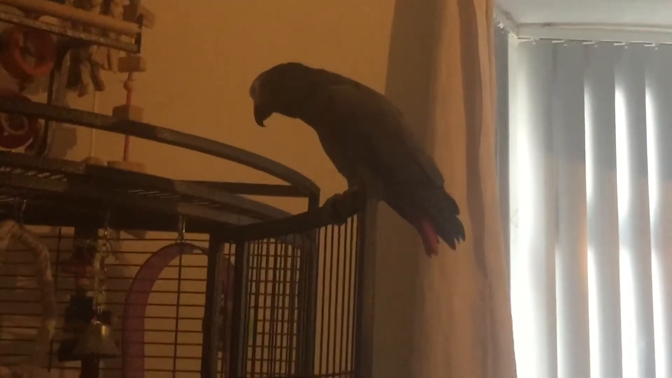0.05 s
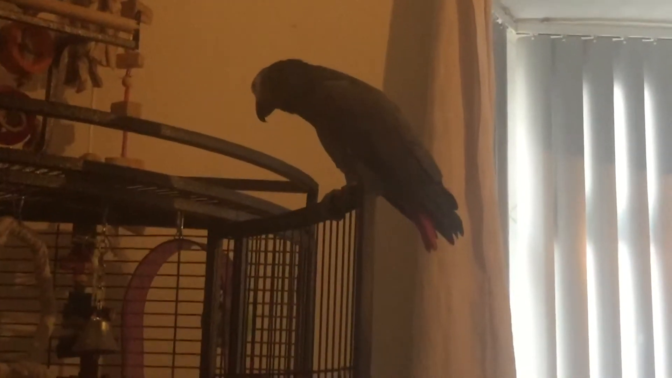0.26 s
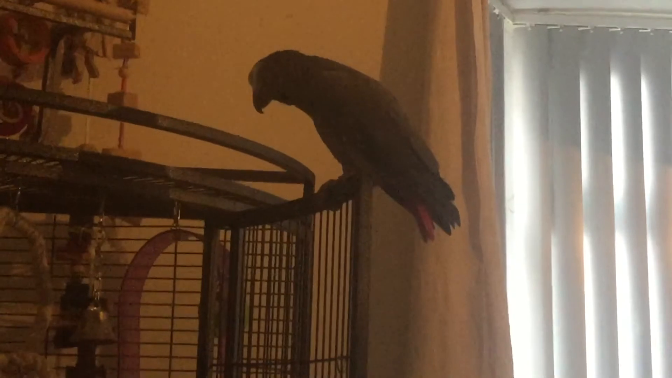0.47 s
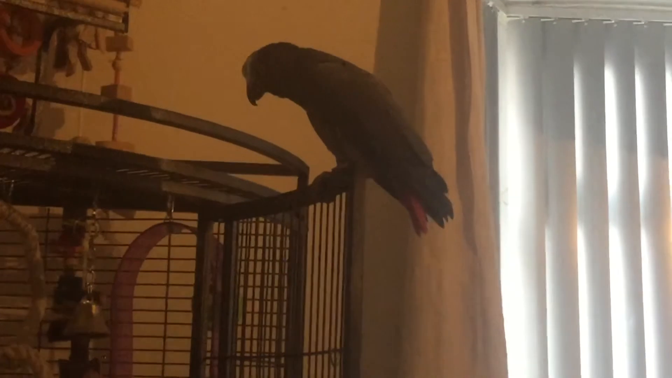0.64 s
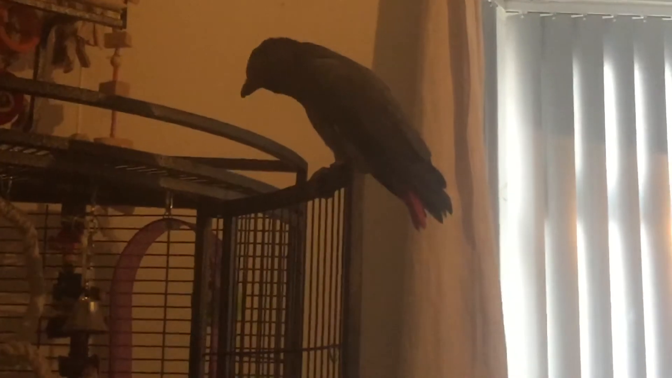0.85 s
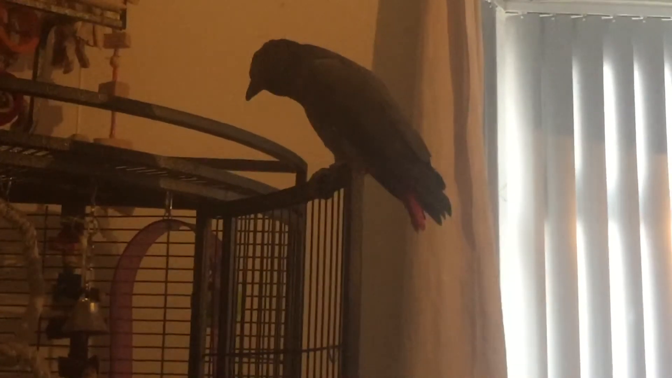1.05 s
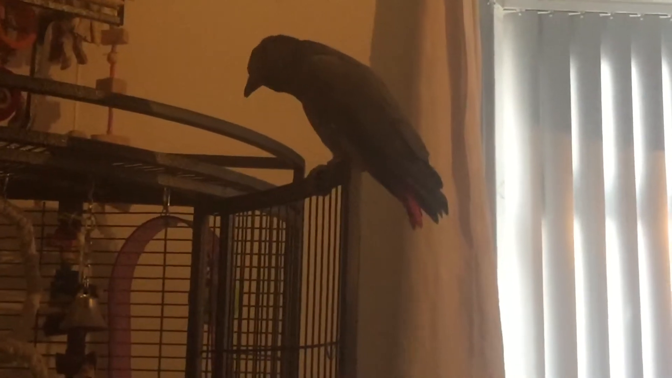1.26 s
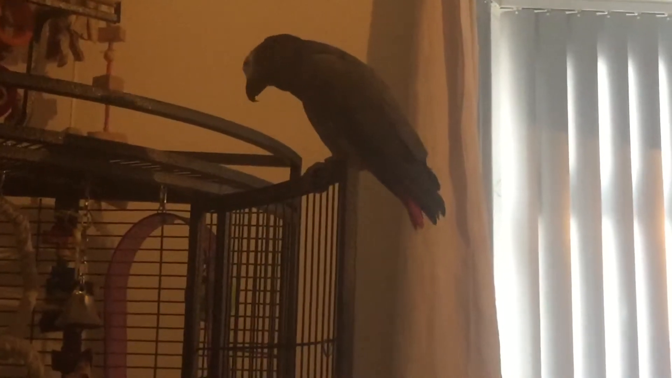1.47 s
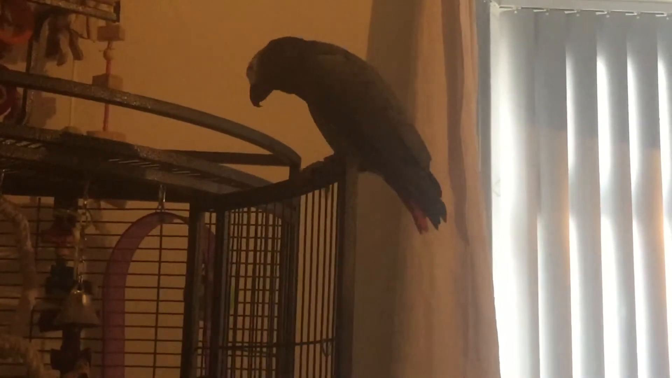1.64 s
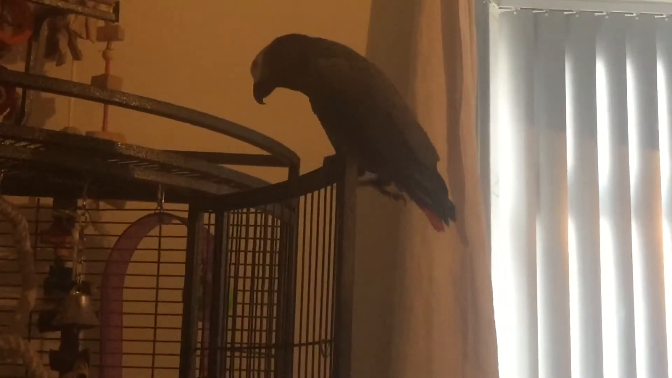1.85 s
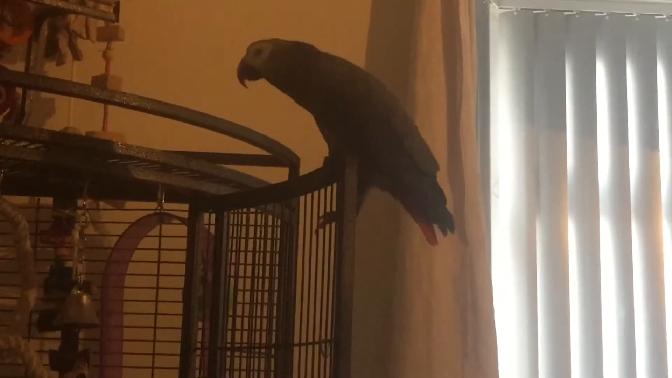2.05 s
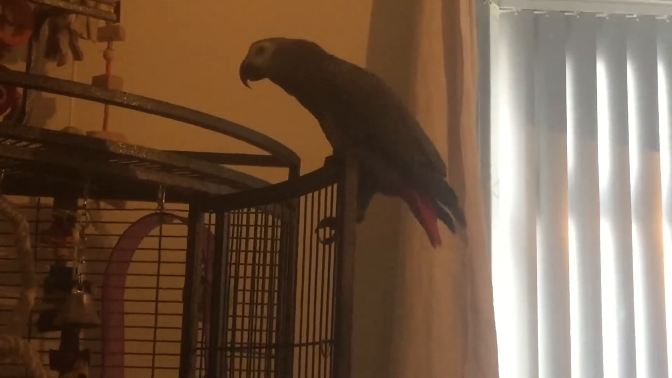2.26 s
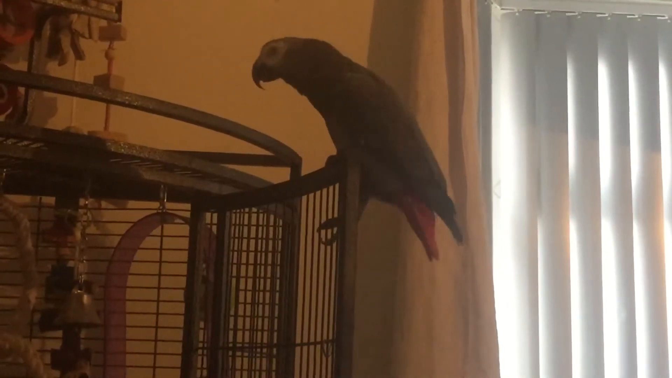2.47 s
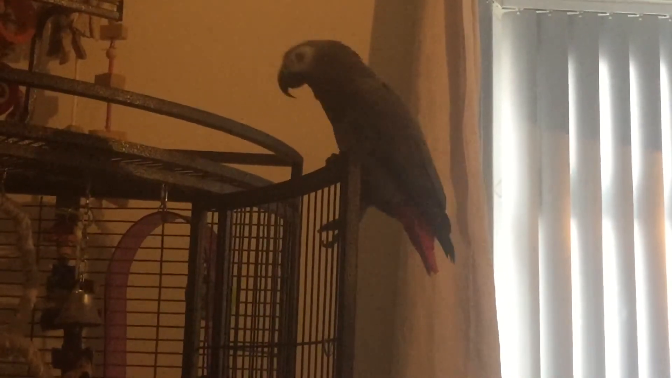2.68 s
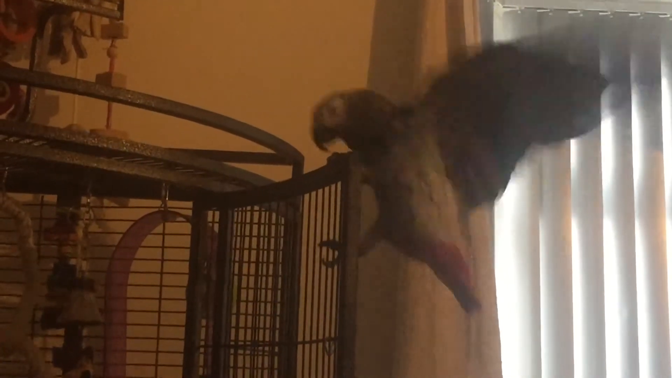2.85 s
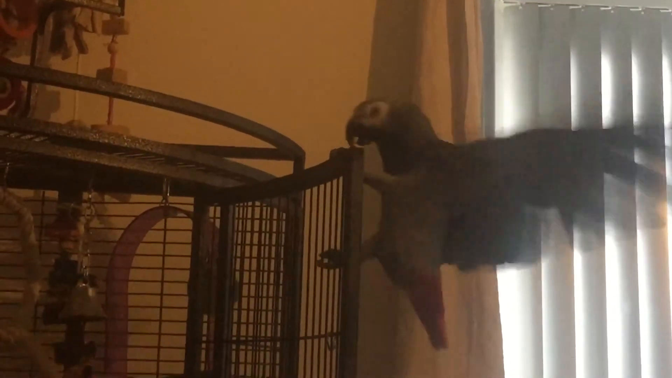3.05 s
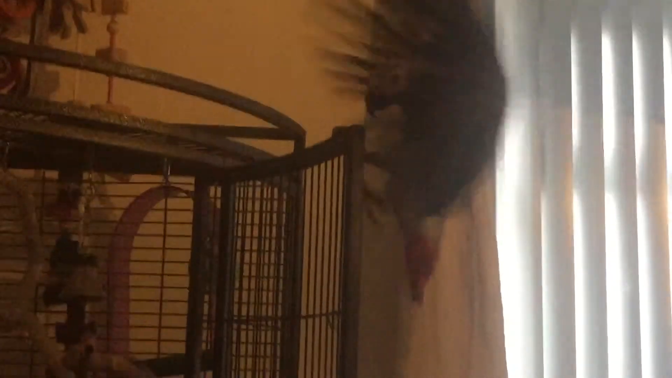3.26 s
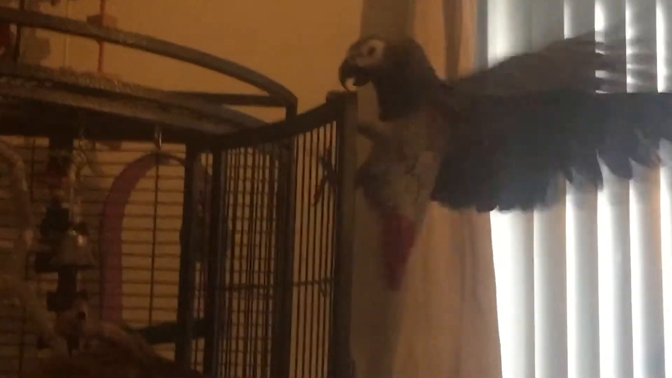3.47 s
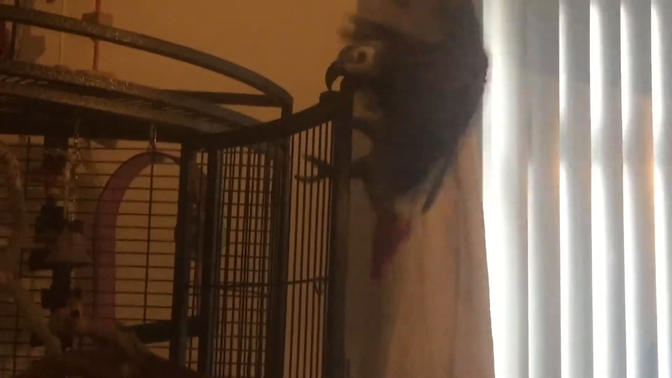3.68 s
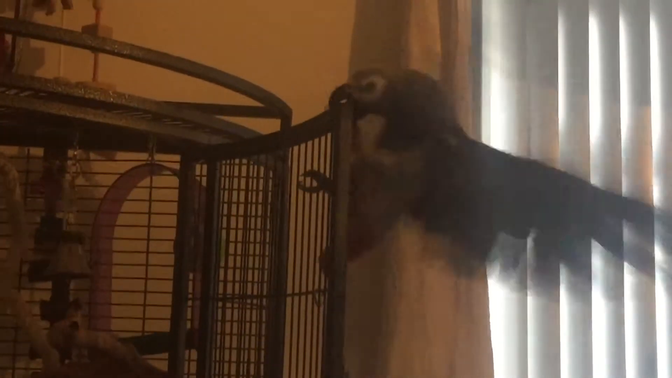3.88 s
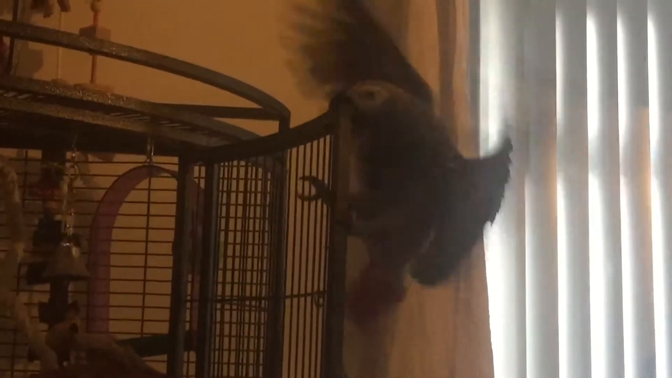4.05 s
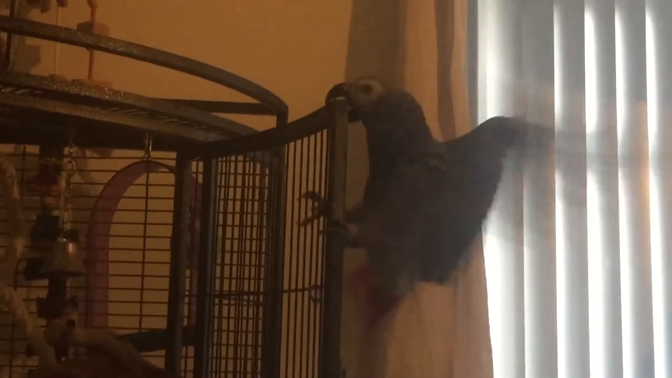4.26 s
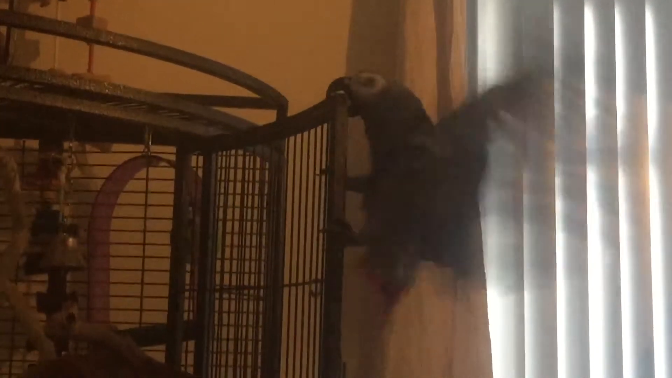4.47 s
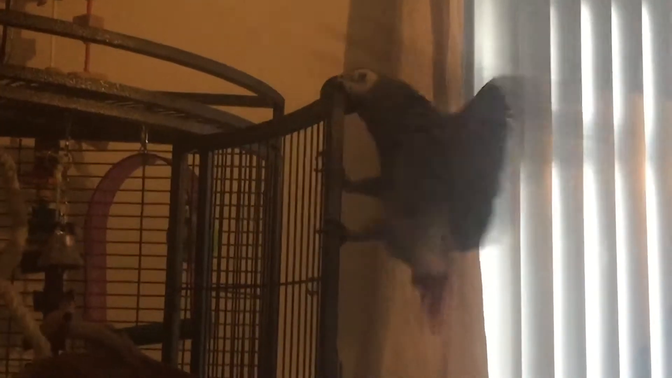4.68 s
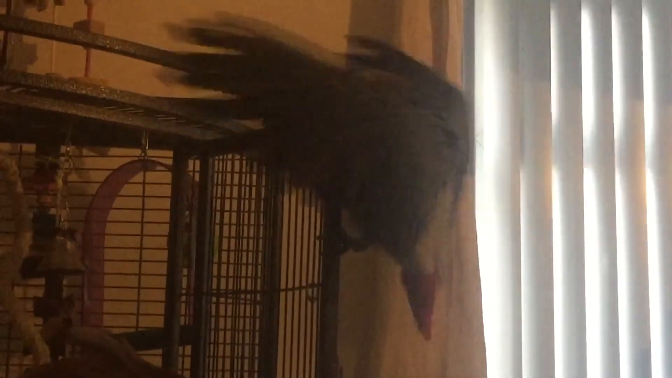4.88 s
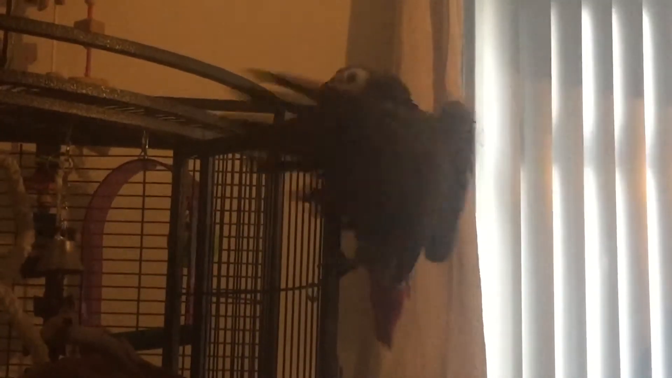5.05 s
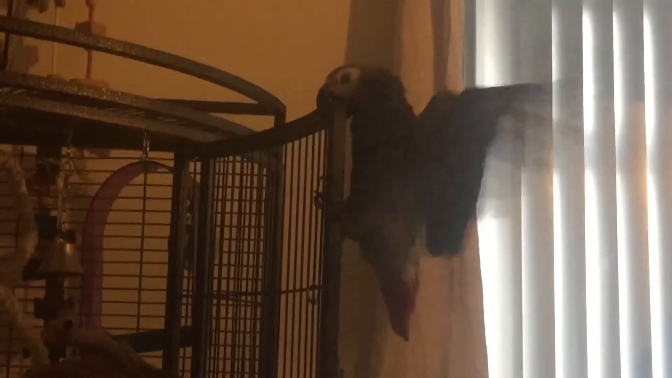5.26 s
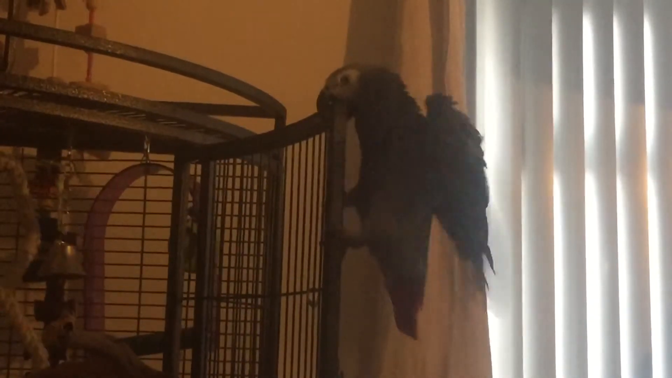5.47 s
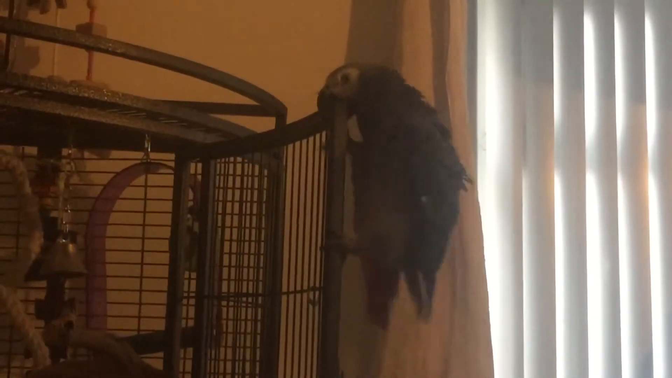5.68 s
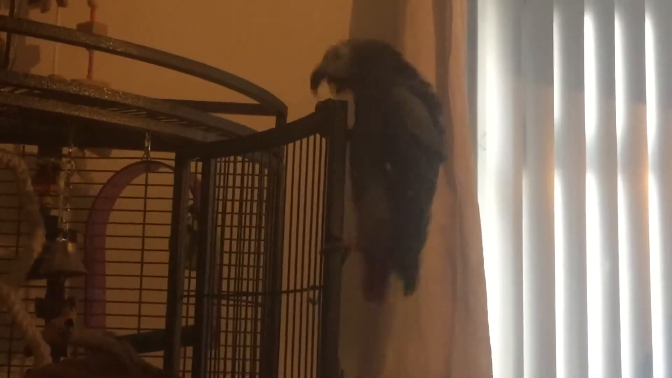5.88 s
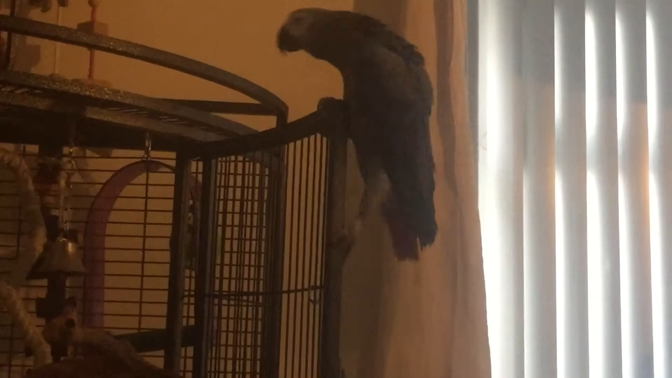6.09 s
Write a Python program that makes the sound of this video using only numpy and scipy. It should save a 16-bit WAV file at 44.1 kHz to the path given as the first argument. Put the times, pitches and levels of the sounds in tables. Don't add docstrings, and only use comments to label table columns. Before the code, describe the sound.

In a small, fairly dry room, a steady low electrical hum and soft ventilation continue throughout. A parrot on a wire cage makes faint brushes, a latch knock and claw scrapes. Then its wings beat fast, about seven strokes a second, with crisp feather hiss, snaps and soft thumps, while wires ring and the latch rattles. The flapping thins out, leaving hum and light rustles. The microphone is nearby and catches low gusts of air.

```python
import sys
import numpy as np
from scipy import signal
from scipy.fft import rfft, irfft, next_fast_len
from scipy.io import wavfile

SR = 44100
rng = np.random.default_rng(int(sys.argv[2]) if len(sys.argv) > 2 else 0)


def elevation(decibels):
    levels = np.asarray(decibels, float)
    return 10 ** (levels / 20)


def to_wav(s):
    ch = np.atleast_2d(s).T
    pcm = np.round(np.clip(ch, -1, 1) * 32767)
    wavfile.write(sys.argv[1], SR, pcm.astype(np.int16))


N = 270059


def rms_one(x):
    return x / np.sqrt(np.mean(x ** 2) + 1e-20)


def in_time(rows):
    s, *columns = np.transpose(rows)
    return [np.interp(np.arange(N) / SR, s, c) for c in columns]


def drift(rate_hz):
    r = np.exp(-80 * np.pi * rate_hz / SR)
    chance = rng.standard_normal(N // 40 + 2002)
    slow = signal.lfilter([1], [1, -2 * r, r * r], chance)[2000:]
    return np.interp(np.arange(N) / 40, np.arange(len(slow)), rms_one(slow))


def coloured(spectrum):
    hz, db = np.transpose(spectrum)
    size = next_fast_len(N)
    grid_hz = np.maximum(np.fft.rfftfreq(size, 1 / SR), 1)
    gain = elevation(np.interp(np.log(grid_hz), np.log(hz), db))
    return rms_one(irfft(rfft(rng.standard_normal(size)) * gain, size)[:N])


def resonance(x, hz, width_hz):
    r = np.exp(-np.pi * width_hz / SR)
    poles = [1, -2 * r * np.cos(2 * np.pi * hz / SR), r * r]
    return signal.lfilter((1 - r * r) / 2 * np.array([1, 0, -1]), poles, x)


def tone(hz, level_db, phase):
    t = np.arange(N) / SR
    return np.sqrt(2) * elevation(level_db) * np.sin(2 * np.pi * hz * t + phase)


def bursts(times, levels_db, lengths, rise_s):
    out = np.full(N, 1e-9)
    for s, db, length in zip(times, levels_db, lengths):
        start = int((s - rise_s) * SR)
        length = max(length, .004)
        t = np.arange(min(int(8 * length * SR), N - start)) / SR
        swell = (1 - np.exp(-2 * t / rise_s)) * np.exp(-(t / length) ** 1.33)
        out[start:start + len(t)] += elevation(db) * swell
    return out


def patchy(noise, low_hz, high_hz, patch_db, rate, count=7):
    size = next_fast_len(N)
    spectrum = rfft(noise, size)
    pitch = np.log(np.fft.rfftfreq(size, 1 / SR) + 1)
    centres = np.log(np.geomspace(low_hz, high_hz, count))
    out = np.zeros(N)
    for one in np.eye(count):
        band = irfft(spectrum * np.interp(pitch, centres, one), size)[:N]
        out += band * elevation(patch_db * drift(rate))
    return rms_one(out)


def grainy(noise):
    grains_per_s, grain_share = 900, 0.43
    sizes = elevation(5.2 * np.minimum(rng.exponential(1, N), 3.0))
    catches = (rng.random(N) < grains_per_s / SR) * sizes
    return rms_one(noise * (1 + grain_share * rms_one(signal.lfilter([1], [1, -.93], catches))))


def knocks(table):
    out = np.zeros(N)
    size = int(.3 * SR)
    for s, db, hz, width_hz, t60 in table:
        start = int(s * SR)
        t = np.arange(min(size, N - start)) / SR
        band = resonance(rng.standard_normal(size), hz, width_hz)
        cluster = rms_one(resonance(band, hz, width_hz))[:len(t)]
        onset = 1 - np.exp(-t / (0.0088 * t60 ** 2 + 0.00041))
        out[start:start + len(t)] += cluster * elevation(db - 60 * t / t60) * onset
    return out


def struck(modes, hits):
    return knocks([(s, db + mode_db, hz, width_hz, t60 * ring)
                   for s, db, ring in hits for hz, width_hz, mode_db, t60 in modes])


def room(x):
    t60_s = 0.06
    t = np.arange(int(.4 * SR)) / SR
    noise = rng.standard_normal(len(t)) * (t > .006)
    dull = signal.lfilter([.3], [1, -.7], noise)
    bright = noise - dull
    tail = dull * elevation(-60 * t / t60_s) + bright * elevation(-60 * t / (0.85 * t60_s))
    return signal.fftconvolve(x, tail / np.sqrt(np.sum(tail ** 2)))[:N]


def ventilation():
    # frequency in Hz, density in dB per Hz.
    air_spectrum = [(20, -34), (40, -37.5), (70, -11), (130, -13.5), (200, -16), (370, -29), (560, -22.5),
                    (750, -26), (1500, -33.5), (1850, -49), (2200, -47), (6500, -53), (10500, -57),
                    (15800, -55.5)]
    # centre in Hz, width in Hz, level in dB.
    duct = [(290, 15, -1), (410, 62, -7.5), (516, 17, -7.5), (606, 16, -10), (692.6, 8.3, 0.5),
            (950, 55, -4.5), (990, 35, -8.5), (1200, 22, -2), (1373, 78, -8.5), (1650, 57, -4),
            (1758, 36, -6), (1850, 11, -15.5), (2628, 31, -16.5)]
    air = coloured(air_spectrum)
    flow = signal.sosfilt(signal.butter(2, 2200, fs=SR, output="sos"), air)
    out = elevation(-54) * (air + flow * (elevation(drift(7.6)) - 1))
    white = rng.standard_normal(N)
    for hz, width_hz, db in duct:
        out += elevation(db - 68.5 + 2.5 * drift(3.2)) * rms_one(resonance(white, hz, max(width_hz, 20)))
    return out


def appliance():
    # time in seconds, level in dB.
    hum = [(0.0, -32.5), (0.03, -31), (0.47, -34), (1.04, -31.5), (1.29, -34), (2.13, -32), (2.56, -34),
           (2.74, -32.5), (3.0, -34), (3.44, -31), (3.7, -33), (3.73, -34.5), (4.23, -30.5), (4.72, -33),
           (5.4, -31.5), (5.9, -34), (6.09, -32.5), (6.12, -34.5)]
    # time in seconds, level in dB.
    overtone = [(0.0, -54), (0.19, -64), (1.45, -57.5), (1.52, -76), (1.6, -56), (2.15, -73), (2.23, -48),
                (2.38, -64), (2.54, -56), (2.64, -68), (4.18, -57.5), (4.23, -70), (4.82, -57), (5.13, -67),
                (6.03, -61), (6.12, -70)]
    # frequency in Hz, level in dB, wobble in dB.
    tones = [
        (38.8, -67.5, -0.5),
        (834.4, -61, 0.4),
        (1500, -70.5, 2),
    ]
    out = tone(99.95, in_time(hum)[0] + 0.52 * drift(6.3), 0.18 * drift(0.45))
    out += tone(198.5, in_time(overtone)[0] - 0.5, 1.4 * drift(3.0))
    for hz, db, wobble_db in tones:
        out += tone(hz, db + wobble_db * drift(1.2), 1.11 * drift(1.1))
    return out


def rustles():
    # start in seconds, level in dB, ring in Hz, width in Hz, t60 in seconds.
    brushes = [(.26, -54.5, 1260, 500, 0.44), (.28, -61, 1650, 500, 0.38), (1.29, -62, 3380, 400, .1),
               (2.097, -56, 9200, 8900, .16), (2.099, -61.5, 4500, 500, 0.33),
               (2.125, -58.5, 3000, 500, 0.51), (2.13, -56.5, 3900, 5000, 0.36),
               (2.15, -59, 1730, 400, 0.21), (2.881, -70, 4460, 300, .5), (2.885, -69, 5200, 400, .5),
               (2.89, -73, 8700, 600, .4), (2.9, -61, 4000, 3500, .3), (4.353, -50, 9800, 249, 0.16),
               (4.353, -49, 8600, 300, 0.22), (4.353, -50, 11900, 5984, 0.16),
               (5.104, -56, 6150, 800, 0.31), (5.528, -50, 11300, 600, 0.29), (5.53, -59, 3195, 60, .7),
               (5.281, -55, 11000, 400, .12), (5.11, -56, 1970, 150, .3), (3.67, -51.5, 1976, 101, .35),
               (3.655, -57, 4790, 80, .6), (2.245, -64, 11400, 596, 0.23), (5.701, -55.5, 9800, 500, .2),
               (5.701, -57, 11600, 700, 0.18), (5.701, -58, 14150, 500, 0.18),
               (5.701, -51.5, 12000, 7000, .16), (4.632, -42.5, 4940, 5000, 0.25),
               (5.529, -64, 9900, 8700, .08), (5.979, -60, 5100, 2500, 0.15), (5.99, -64, 2690, 2000, 0.37),
               (6.016, -68, 9000, 8950, 0.16)]
    return knocks(brushes)


def latch():
    # centre in Hz, width in Hz, level in dB, t60 in seconds.
    modes = [(5990, 410, 4, 0.071), (6200, 880, -11, 0.38), (3310, 390, -10.5, 0.19),
             (1400, 810, -8.5, 0.34), (7300, 1300, -16.5, 0.12), (2560, 200, -11.5, 0.14),
             (10000, 9050, -14, .028)]
    # start in seconds, level in dB, share of the ring time.
    hits = [
        (1.56, -46, 0.7),
        (2.243, -63, 1),
        (2.736, -65.5, 1),
        (4.2817, -43.5, 0.86),
        (6.019, -60.5, 1.04),
    ]
    return struck(modes, hits)


def chain():
    # centre in Hz, width in Hz, level in dB, t60 in seconds.
    modes = [(9400, 480, 1, 0.24), (11900, 1000, -5, 0.18), (14300, 1400, -16, 0.12),
             (11900, 9400, 0, 0.23)]
    # start in seconds, level in dB, share of the ring time.
    hits = [
        (3.416, -43, 1.2),
    ]
    return struck(modes, hits)


def wires(count=10):
    # start in seconds, level in dB, brightness in dB per octave, freedom to ring 0-1.
    claws = [(2.0963, -55.5, 3, 0.8), (2.139, -60, -1, 0.9), (2.2423, -54, 1.5, 0.28), (2.4244, -70, 3, .7),
             (3.316, -56, 6, .5), (3.358, -59, -3, 0.7), (3.634, -42, 7.5, 0.85), (3.679, -49.5, 3, 0.5),
             (4.2272, -58, -3, 0.8), (4.2827, -43, 5, 0.53), (4.355, -59, 13, .75), (4.431, -39.5, 7, 0.3),
             (4.44, -39.5, -1, 1), (4.4682, -45, -1, 0.6), (4.6315, -38.5, 3.5, 0.38), (5.094, -51, 11, 1),
             (5.247, -53, 3, 0.5), (5.2795, -54, 12.5, 0), (5.3957, -48, 7.5, 0.4),
             (5.5257, -47, 5.5, 0.66), (5.701, -67, 13, 0.3)]
    places = [.075, .18, .36, .25, .315, .49, .335, .37, .315, .09, .355, .08, .27, .07, 0.285, .26, 0.41,
              0.15, .185, .185, .17]
    # frequency in Hz, spread between wires in Hz, t60 in seconds, trim in dB.
    modes = [(1974, 30, 0.52, -4), (3215, 54, 0.35, -1), (4790, 70.5, 0.46, -3.5), (6620, 306, 0.25, 1),
             (8870, 270, 0.3, 0), (11470, 310, 0.11, -2), (14500, 760, 0.12, -4.5), (5400, 430, 0.11, -9),
             (7500, 450, 0.06, -35), (9900, 420, .1, -7.5), (12800, 440, .07, -11.5)]
    half_waves = [3, 4, 5, 6, 7, 8, 9, 6, 6, 7, 8]
    node_leak, pivot_hz, drag_s = .05, 6680, 0.01547
    out = np.zeros(N)
    size = int(.4 * SR)
    t = np.arange(size) / SR
    contact = (1 - np.exp(-t / 0.00031)) * np.exp(-(t / drag_s) ** 0.59) + 1e-9
    push_size = size // 4
    scratch = coloured([(2000, -14), (2800, -3), (6000, 9.0), (12000, -10), (15800, 11)])[:size]
    for (s, level_db, bright_db, freedom), place in zip(claws, places):
        start = int(s * SR)
        grip = elevation(level_db + 0.35 * bright_db - 16.0) * contact * scratch
        for (hz, spread_hz, t60, trim_db), order in zip(modes, half_waves):
            tilt_db = bright_db * np.log2(max(hz, 3000) / pivot_hz)
            drive = elevation(level_db + tilt_db) * (abs(np.sin(np.pi * order * place)) + node_leak)
            for free in np.linspace(.22, 1, count):
                width_hz = np.log(1000) / (np.pi * t60 * free * np.clip(freedom, .15, 1))
                wire_hz = hz + spread_hz * rng.uniform(-1.223, 1) * (2.6 - 2.3 * free)
                push = rng.standard_normal(push_size) * contact[:push_size]
                rung = resonance(np.pad(push, (0, size - push_size)), wire_hz, width_hz)
                grip += drive * elevation(trim_db + 1) * rung / np.max(np.abs(rung)) / np.sqrt(count)
        out[start:start + size] += grip[:N - start]
    return out


def snaps():
    # start in seconds, peak in dB, centre in Hz.
    quills = [(2.143, -43, 5000), (3.0005, -33, 5000), (3.1636, -36, 5000), (3.314, -28, 5000),
              (3.4537, -27, 5000), (3.5144, -28, 5000), (3.5424, -36, 5010), (3.586, -24, 5000),
              (3.6127, -31, 5000), (3.73, -31, 5000), (3.869, -34, 5000), (3.893, -28, 5000),
              (4.0012, -28, 5000), (4.12, -39, 5000), (4.428, -25, 4970), (4.7017, -30, 5000),
              (4.827, -28, 5000), (4.9556, -27, 5000), (5.1074, -34, 5000), (5.394, -42, 5000),
              (5.5288, -31, 5000), (5.7023, -43, 5000)]
    return knocks([(s, db - 16.5, hz, 1.26 * hz, 0.025) for s, db, hz in quills])


def claps():
    # start in seconds, level in dB, ring in Hz, width in Hz, t60 in seconds.
    air_claps = [(3.355, -33.5, 550, 200, 0.075), (3.49, -40, 440, 200, 0.18),
                 (3.565, -44, 1500, 400, 0.12), (3.608, -42, 950, 250, 0.15), (3.615, -42, 526, 200, 0.22),
                 (3.745, -59, 597, 400, 0.11), (3.858, -33.5, 590, 298, 0.074), (3.34, -45, 290, 120, 0.4),
                 (3.6, -48, 290, 140, 0.27), (3.74, -44, 290, 120, .2), (4.57, -46, 278, 150, 0.23),
                 (4.84, -43, 295, 160, 0.27), (4.96, -41.5, 282, 160, 0.35), (4.13, -45, 1500, 1200, .2),
                 (3.891, -37.5, 950, 300, 0.069), (3.891, -41.5, 3050, 700, 0.039),
                 (3.986, -36, 560, 300, 0.05), (4.01, -45, 600, 300, .2), (4.555, -37, 168, 120, 0.1),
                 (4.698, -43, 1400, 250, 0.17), (4.812, -41, 567, 255, 0.089),
                 (4.844, -39.5, 505, 200, 0.29), (4.85, -45.5, 1200, 400, 0.31), (4.46, -45, 420, 100, .2),
                 (3.385, -45, 300, 90, .2), (3.862, -38, 580, 150, .08), (5.528, -56, 6900, 600, .25),
                 (5.408, -56, 6400, 400, .2), (5.405, -58, 4600, 500, .15), (4.435, -56, 1955, 50, .7),
                 (4.931, -42, 576, 200, 0.2), (4.958, -51, 1400, 900, 0.26), (4.825, -51, 1780, 700, .2)]
    return knocks(air_claps)


def flapping():
    return np.interp(np.arange(N) / SR, [2.78, 2.9, 5.66, 5.78], [0, 1, 1, 0])


def gusts():
    # time in seconds, level in dB.
    draught = [(2.8, -74), (3.27, -52), (3.54, -58), (4.08, -49), (4.7, -60), (4.77, -51), (5.07, -52),
               (5.14, -64), (5.85, -74)]
    rumble = coloured([(22, -56), (33, -1), (42, 12.5), (65, -1.5), (90, -7), (140, -35.0)])
    return flapping() * elevation(in_time(draught)[0] + 1.2 * drift(5.0)) * rumble


def thumps(times, levels_db, lengths):
    out = np.zeros(N)
    air = rng.standard_normal(N)
    pockets_hz = 540 * (1 + 0.073 * rng.standard_normal(len(times)))
    for s, db, hz, length in zip(times, levels_db, pockets_hz, lengths):
        air = np.roll(air, 7919)
        pocket = rms_one(resonance(air, hz, 0.23 * hz))
        pocket += .5 * rms_one(resonance(air, 1.64 * hz, 1.5 * hz))
        out += pocket * bursts([s - .008], [db], [1.8 * length], rise_s=0.013)
    return out * elevation(2.0 * drift(32))


def wings():
    # start in seconds, hiss in dB, swish in dB, thump in dB, length in seconds.
    strokes = [(3.005, -33, -45.5, -69, 0.037), (3.1676, -35, -43, -52, 0.046),
               (3.32, -28, -39.5, -46, 0.015), (3.441, -32, -51, -46.5, 0.062),
               (3.581, -41, -42, -44, 0.018), (3.728, -33.5, -41, -48, 0.054),
               (3.866, -31.5, -57, -46.5, 0.035), (3.9994, -33, -43, -53, 0.056),
               (4.119, -59, -37.5, -53, 0.064), (4.282, -29.5, -68, -50, 0.038),
               (4.437, -23.5, -51, -55, 0.043), (4.57, -35.5, -62, -49.5, 0.043),
               (4.703, -33, -60, -45.5, 0.037), (4.847, -40.5, -51, -46.5, 0.04),
               (4.961, -34, -43.5, -47, 0.057), (5.118, -35, -51, -59, 0.037),
               (5.298, -35, -61, -72, 0.031), (5.405, -35.5, -64, -66, 0.061),
               (5.562, -61, -70, -66, 0.026)]
    flicks = [(2.988, -44, -55, -62, 0.047), (3.09, -41.5, -55, -74, .03), (3.255, -44, -54, -69, 0.02),
              (3.338, -42, -56, -45.5, 0.037), (3.531, -33, -71, -63, .04), (3.545, -38, -47, -62, 0.025),
              (3.607, -30.5, -48, -46, 0.042), (3.865, -44, -48, -56, 0.25), (4.775, -44, -68, -58, 0.062),
              (4.827, -25, -37, -41, 0.017), (4.935, -60, -66, -45.5, 0.017)]
    # time in seconds, level in dB.
    effort = [(2.8, -69), (2.94, -65), (3.38, -48.5), (3.56, -44.5), (3.86, -51.5), (4.68, -46.5),
              (4.85, -47), (5.11, -53.5), (5.85, -55.5)]
    # frequency in Hz, density in dB per Hz.
    rub_spectrum = [(1760, -41), (3000, 0), (5010, -4.5), (9110, -3), (10200, -3), (12900, -3),
                    (15800, -4.5)]
    s, hiss_db, swish_db, thump_db, length = np.transpose(strokes + flicks)
    mean_effort_db = -50
    swing_db = in_time(effort)[0] - mean_effort_db
    moving = flapping()

    def flutter(offset_db, share):
        return moving * elevation(mean_effort_db + offset_db + share * swing_db)

    wake = bursts(s, hiss_db - 29, np.full(len(s), 0.06), rise_s=0.016)
    hiss = patchy(grainy(coloured(rub_spectrum)), 2650, 17000, patch_db=3.0, rate=18)
    hiss *= elevation(1.87 * drift(53))
    hiss *= bursts(s, hiss_db - 14.5, length, rise_s=0.0095) + flutter(-10.5, 0.79) + wake

    swish = coloured([(400, -28), (750, -3.0), (1500, 0), (2500, -4.5), (4000, -10.5), (6000, -19.5)])
    swish = patchy(grainy(swish), 870, 4800, patch_db=2.0, rate=8.5) * elevation(1.8 * drift(75))
    swish *= bursts(s, swish_db - 5.0, 0.84 * length, rise_s=0.0042) + flutter(-9.5, 1.65)

    puff = bursts(s - .012, thump_db - 9, np.full(len(s), 0.078), rise_s=0.014)
    buffet = coloured([(90, -2), (125, 9.5), (200, 4.0), (280, 2.5), (400, -6.0), (700, -26.0)])
    buffet *= elevation(4.1 * drift(15.0)) * (flutter(-5, 0.98) + puff)
    return hiss + swish + thumps(s, thump_db, length) + buffet


def scene():
    cage = rustles() + latch() + chain() + wires()
    bird = cage + snaps() + claps() + wings()
    background = ventilation() + appliance()
    return (bird + elevation(-9.5) * room(bird) + gusts() + background)[None]


def band_limit(x):
    return signal.sosfilt(signal.butter(12, 15910, fs=SR, output="sos"), x)


def record(dry):
    cut = signal.sosfilt(signal.ellip(12, .5, 75, 15740, fs=SR, output="sos"), dry)
    return band_limit(cut)


dry = scene()
out = record(dry)
to_wav(out)
```